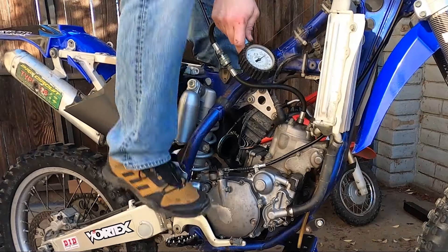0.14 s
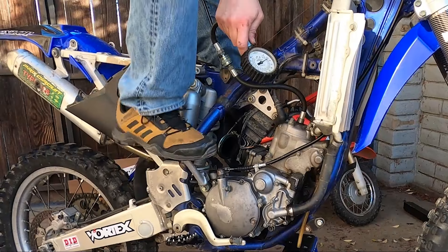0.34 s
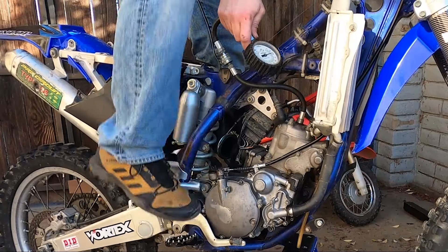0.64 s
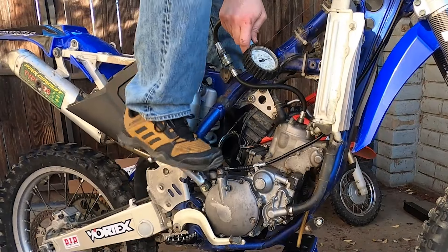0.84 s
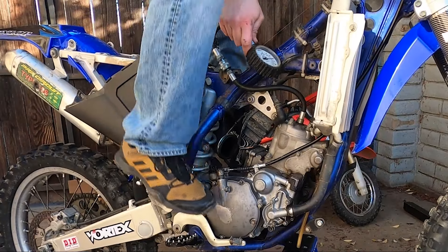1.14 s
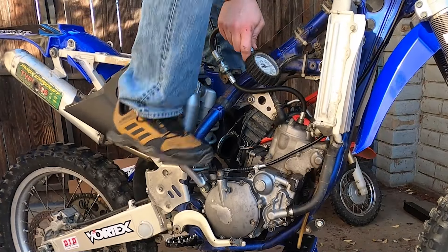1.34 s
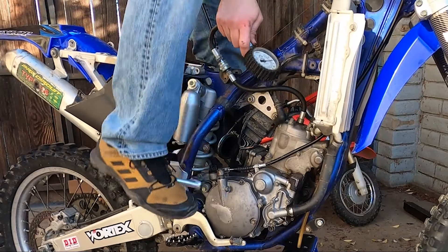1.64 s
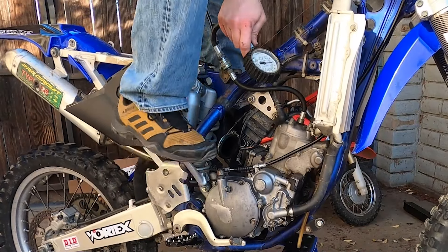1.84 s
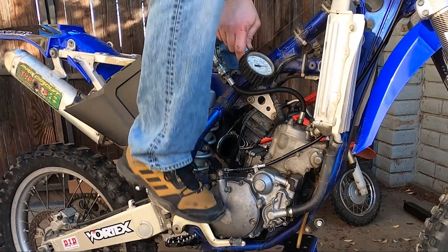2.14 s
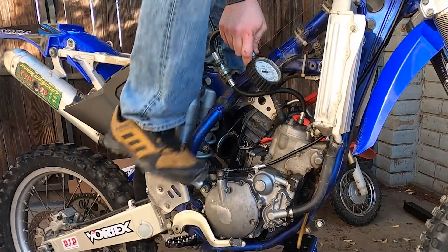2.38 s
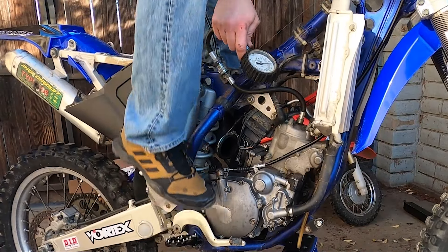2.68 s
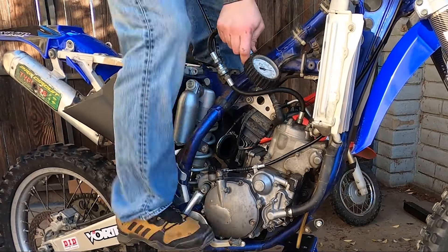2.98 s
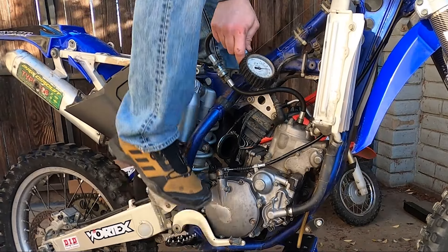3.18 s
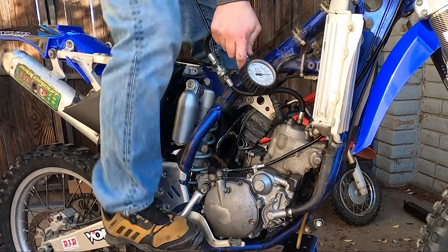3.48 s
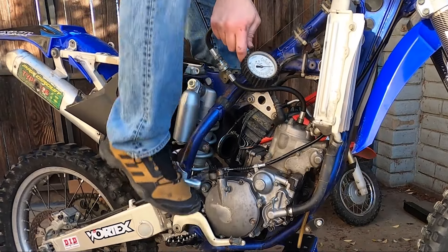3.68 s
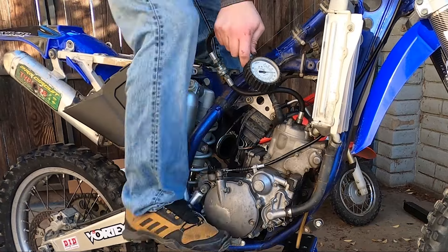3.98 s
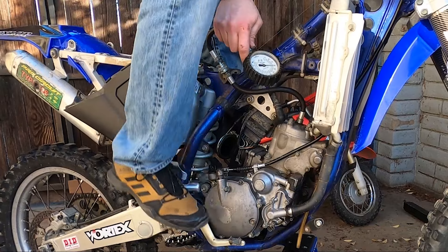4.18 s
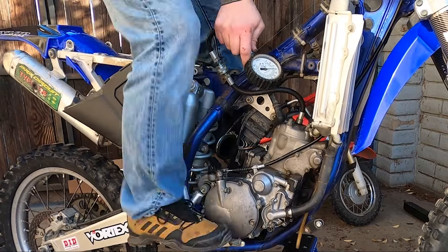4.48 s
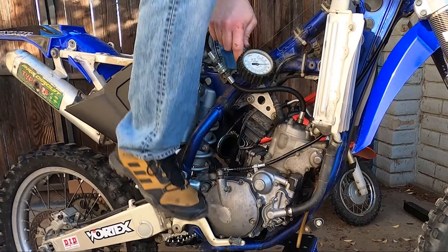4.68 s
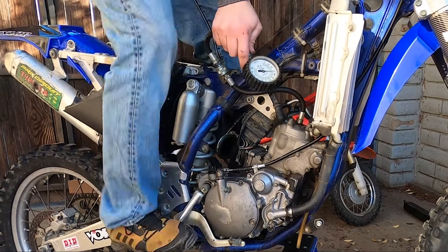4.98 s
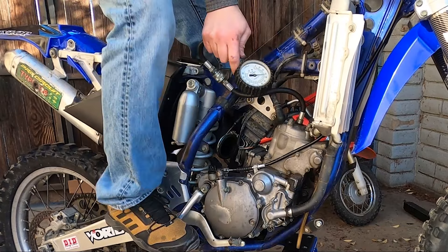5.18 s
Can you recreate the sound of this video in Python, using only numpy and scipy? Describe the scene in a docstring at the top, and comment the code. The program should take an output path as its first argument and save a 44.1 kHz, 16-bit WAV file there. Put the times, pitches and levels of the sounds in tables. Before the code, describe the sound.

A small two-stroke engine is kicked over by foot, close to a mono microphone in a quiet yard with faint, short echoes off fence and bricks. The first stroke arrives at about 0.1 s with a pop and metallic clacks; others follow roughly every half second, near 0.55, 1.05, 1.5, 2.05, 2.5, 3.05, 3.55, 4.05, 4.5 and 5.05 s. Each begins with lever and ratchet clacks and a dull knock, then a sharp crack dropping into a hollow low pop, a short nasal intake honk around 900 hertz, and usually a second pop some 0.07 s later. Lumpy, grinding gear noise swells beneath and runs down quickly. Small ticks and bright pings fill the gaps; a very faint squeak sinks at 1.8 s and a barely audible groan comes at 3.9 s. The clack at 3.55 s is especially hard. The engine never fires; the last rattle fades after 5.2 s into soft air noise and faint hum.

```python
"""Beside a fence and a brick wall, a boot kicks a small two-stroke engine over twice a second; it never fires.
At each turn the exhaust port pops in three falling steps and the intake honks, both made of short resonances.
Lever, ratchet and gears clack as noise rattles ringing in the metal, over the crank's churn of lumpy noise.
Sparse echoes come off the fence and bricks, and a quiet yard with a faint hum lies behind."""
import sys
import numpy as np
from scipy import signal
from scipy.fft import rfft, irfft
from scipy.io import wavfile
from scipy.ndimage import uniform_filter1d

SR = 44100
rng = np.random.default_rng(int(sys.argv[2]) if len(sys.argv) > 2 else 0)


def dump(signal):
    """Clip the signal to [-1, 1] and save it as 16-bit WAV at the path in sys.argv[1]."""
    limited = np.clip(np.atleast_2d(signal).T, -1, 1)
    pcm = np.round(limited * 32767).astype(np.int16)
    wavfile.write(sys.argv[1], SR, pcm)


N = 234590

# Colour of metal struck on metal. Each row: frequency in Hz, relative spectral level in dB.
BLOW_COLOUR = [(200, -29), (500, -7.5), (1160, -2.5), (1500, -6), (2050, -7.5), (2800, -3.5), (6500, -17.5),
               (8700, -15), (16000, -57)]


def gain_of(db):
    """Turns dB into an amplitude factor."""
    return 10 ** (np.asarray(db) / 20)


def evened(x):
    """Scales a signal to rms 1."""
    return x / np.sqrt(np.mean(x ** 2) + 1e-20)


def read(points, hz):
    """Reads a curve of (Hz, value) rows on a log-frequency axis."""
    f, value = np.transpose(points)
    return np.interp(np.log(hz + 1), np.log(f + 1), value)


def add(mix, s, sound):
    """Mixes a sound in at s seconds, cut at the end of the mix."""
    part = mix[round(s * SR):][:len(sound)]
    part += sound[:len(part)]


def coloured(count, points, tilt_db=0):
    """Noise of rms 1 with the given spectrum, tilted about 2 kHz by tilt_db per octave."""
    hz = np.fft.rfftfreq(count, 1 / SR)
    shape_db = read(points, hz) + tilt_db * np.log2((hz + 50) / 2000)
    return evened(irfft(rfft(rng.standard_normal(count)) * gain_of(shape_db), count))


def resonate(x, hz, width):
    """A resonance of gain 1: shifts the pitch hz (fixed or a curve) to zero, smooths, and shifts back."""
    turn = np.exp(2j * np.pi * np.cumsum(hz * np.ones(len(x))) / SR)
    r = np.exp(-np.pi * width / SR)
    smoothed = signal.lfilter([1 - r], [1, -r], x / turn + 1e-18)
    return 2 * (turn * smoothed).real


def burst(start, hz, db, t60, rise, rough):
    """One resonance swells at start seconds and dies away, part tone and part breathy noise."""
    t = np.maximum(np.arange(4096) / SR - start, 0)
    width = 0.34 * hz
    noise = evened(resonate(resonate(rng.standard_normal(len(t)), hz, width), hz, width))
    tone = np.sin(2 * np.pi * hz * rng.uniform(0.94, 1.04) * t)
    fade = gain_of(db - 60 * np.maximum(t - rise, 0) / t60)
    swell = np.sin(np.pi / 2 * np.minimum(t / rise, 1))
    return fade * swell * (tone + rough * noise)


def pop(fall, thump_db, crack_db):
    """Air cracks and squirts through the first slit, the emptying cylinder rings, then the slug thumps the pipe."""
    slit_hz, port_ring_hz, cylinder_hz, header_hz = 1402, 2682, 840, 385
    # The exhaust pipe. Each row: frequency in Hz, level in dB against the thump, 60 dB fade in seconds.
    pipe_modes = [(45.5, -16.5, 0.13), (118.7, -12.5, 0.058), (166.3, -7.5, 0.023), (256.6, -9, 0.049)]
    crack = clack(crack_db, -3)
    squirt = burst(0, slit_hz, crack_db - 4.5, 0.036, 0.0031, 0.36)
    barrel = burst(0, port_ring_hz, crack_db - 14, 0.03, 0.001, 0.24)
    cylinder = burst(max(fall - 0.008, 0), cylinder_hz, thump_db - 8.5, 0.031, 0.0025, 1.0)
    thump = -burst(fall - 0.004, header_hz, thump_db - 1, 0.018, 0.0033, 0.66)
    pipe = sum(burst(fall - 0.006, hz, thump_db + db, t60, 0.0063, 0.32) for hz, db, t60 in pipe_modes)
    # the pipe throws air back
    rebound = burst(fall + 0.004025, 0.817 * cylinder_hz, thump_db - 9.5, 0.01, 0.0017, 1.0)
    sound = crack + squirt + barrel + cylinder + thump + pipe + rebound
    blast = clack(thump_db - 14.5, 7)  # bright hiss of the escaping slug
    add(sound, fall, blast)
    return sound


def honk(db, swell):
    """The air box rings as the port opens and again, weaker, as the sucked air surges back."""
    air_box_hz, t60_s = 872, 0.049
    gulp = burst(0, air_box_hz, db, t60_s, swell, 0.32)
    surge_back = burst(0.00576, air_box_hz, db - 11.0, t60_s, 0.0063, 0.82)
    return gulp + surge_back


def clack(db, tilt_db):
    """A crack and a short uneven rattle, part heard direct, part through the ringing cases and lever."""
    # The engine cases. Each row: frequency in Hz, width in Hz, relative level in dB.
    case_modes = [(1493, 220, 0.5), (2690, 170, -5), (3390, 78, -22), (4480, 160, -7.5), (8250, 610, -12),
                  (12130, 3000, -24)]
    # The lever. Each row: frequency in Hz, relative level in dB, 60 dB fade in seconds.
    lever_modes = [(720.5, -5.5, 0.11), (1227, 0, 0.076), (1347, -2.5, 0.14), (2727, -12.5, 0.054)]
    t = np.arange(4096) / SR
    rattle_t60_s = max(0.081 - 0.0046 * tilt_db, 0.02)  # dull blows linger
    bounces = gain_of(2 * evened(uniform_filter1d(rng.standard_normal(len(t)), 90)))
    crack = 1.05 * gain_of(-60 * t / 0.0034)
    attack = np.minimum(t / 0.00074, 1)
    shape = (bounces * gain_of(-60 * t / rattle_t60_s) + crack) * attack
    direct = coloured(len(t), BLOW_COLOUR, tilt_db) * shape
    cases = np.zeros(len(t))
    for hz, width, mode_db in case_modes:  # every blow lands elsewhere and wakes the modes unevenly
        woken_db = mode_db + tilt_db * np.log2(hz / 2000) + 1.0 * rng.standard_normal()
        struck = shape * rng.standard_normal(len(t))
        cases += gain_of(woken_db) * resonate(struck, hz * rng.uniform(0.881, 1.076), width)
    cases *= 0.62 * direct.std() / cases.std()
    lever_db = db - 20 - 1.5 * tilt_db  # the duller the blow, the more the lever rings
    lever = sum(burst(0, hz, lever_db + mode_db, t60, 0.0027, 0.36) for hz, mode_db, t60 in lever_modes)
    return gain_of(db - 8) * (direct + cases) + lever


def thud(db):
    """A soft low knock through the frame, a little higher or lower each time."""
    frame_hz = 387 * rng.uniform(0.83, 1.086)
    return burst(0, frame_hz, db, 0.017, 0.0057, 0.9)


def ping(db, hz):
    """A small loose part rings, short and bright."""
    return burst(0, hz, db, 0.012, 0.00057, 0.69)


def groan():
    """The loaded lever pivot moans on a few fuzzy pitches, swelling slowly and dying faster."""
    # The moan. Each row: frequency in Hz, level in dB before the swell.
    pitches = [(195, -51), (990, -54.5), (1900, -57.5)]
    swell = np.sin(np.linspace(0, np.pi, 6000) ** 2 / np.pi)
    moan = sum(gain_of(db) * evened(resonate(rng.standard_normal(len(swell)), hz, 0.02 * hz))
               for hz, db in pitches)
    return swell * moan


def squeak():
    """A faint fuzzy whistle that sinks and fades as the crank stops."""
    length_s, start_hz, sag_hz, level_db = 0.062, 900, 80.5, -48
    u = np.linspace(0, 1, round(length_s * SR))
    whistle = evened(resonate(rng.standard_normal(len(u)), start_hz - sag_hz * u, 6.4))
    return gain_of(level_db - 10 * u) * np.sqrt(np.sin(np.pi * u) + 1e-9) * whistle


def teeth():
    """Gear teeth knock at scattered moments and sizes, each waking one short ring somewhere in the cases."""
    knocks_per_s, spread_db = 600, 4
    knocks = rng.random(N) < knocks_per_s / SR
    size = gain_of(spread_db * np.minimum(rng.exponential(1, N), 3)) * knocks
    pitches = np.geomspace(1150, 9000, num=16)
    place = rng.integers(0, len(pitches), N)
    t = np.arange(1024) / SR
    total = np.zeros(N)
    for k, hz in enumerate(pitches):
        fade = gain_of(read(BLOW_COLOUR, hz) - 60 * t * hz / 22)  # falls 60 dB in 22 cycles
        ring = fade * np.sin(2 * np.pi * hz * t)
        total += signal.oaconvolve(size * (place == k), ring)[:N]
    return evened(total)


def churn():
    """Rubbing and meshing parts: noise in lumps of changing colour that swells with each stroke and runs down."""
    # Each stroke spins crank, gears and rings. Each row: start in seconds, level in dB.
    strokes = [(0.01, -43), (0.502, -34.5), (0.991, -37), (1.489, -30), (2.014, -33), (2.5, -33),
               (2.989, -30), (3.509, -32.5), (3.992, -33.5), (4.51, -33), (5.012, -35.5)]
    # Colour of the rubbing. Each row: frequency in Hz, relative spectral level in dB.
    rub_colour = [(60, -3), (360, 11.5), (880, 0), (1340, 2), (2050, -11.5), (2770, -8.5), (8120, -15.5),
                  (12500, -25), (16000, -28)]
    spin_up_s, spin_s, run_down_db_per_s, teeth_db = 0.16, 0.15, 167, -5.5  # teeth against the rub
    t = np.arange(N) / SR
    speed = np.zeros(N)
    for start, db in strokes:
        run_down_db = run_down_db_per_s * np.maximum(t - start - spin_s, 0)
        speed += gain_of(db - run_down_db) * np.clip((t - start) / spin_up_s, 0, 1)
    z = signal.stft(coloured(N, rub_colour), nperseg=256, noverlap=192)[2]
    # patches shift the colour, lumps the whole level
    grain = uniform_filter1d(rng.standard_normal(z.shape), 9, axis=0)
    patches = evened(uniform_filter1d(grain, 5, axis=1))
    lumps = evened(uniform_filter1d(rng.standard_normal(z.shape[1]), 4))
    lumpy = z * gain_of(4.0 * patches + 3.7 * lumps)
    rub = evened(signal.istft(lumpy, nperseg=256, noverlap=192)[1][:N])
    return speed * (rub + gain_of(teeth_db) * teeth())


def walls(x):
    """Sparse echoes of random sign off fence and bricks, each band dying at its own speed."""
    # How long the echoes last. Each row: frequency in Hz, 60 dB fade in seconds.
    fades = [(300, 0.29), (8000, 0.19)]
    taps = np.zeros(SR // 2)
    at = np.arange(200, len(taps) - 20, 20)
    taps[at + rng.integers(0, 20, len(at))] = rng.choice([-1., 1.], len(at))
    hz, t, z = signal.stft(taps, SR, nperseg=256)
    decay = gain_of(-60 * t / read(fades, hz)[:, None])
    tail = signal.istft(z * decay, SR, nperseg=256)[1]
    return signal.fftconvolve(x, tail / np.linalg.norm(tail))[:N]


def yard():
    """Quiet outdoor background noise that swells slowly, with a faint fuzzy hum."""
    # Colour of the open air. Each row: frequency in Hz, relative spectral level in dB.
    air_colour = [(20, 14), (70, 0.5), (400, -0.5), (1480, -11), (7950, -28), (14000, -32.5)]
    air_db, hum_hz, hum_db = -63.5, 497, -70
    swell = evened(uniform_filter1d(uniform_filter1d(rng.standard_normal(N), 6000), 4000))
    air = gain_of(air_db + 3.0 * swell) * coloured(N, air_colour)
    hum = evened(resonate(rng.standard_normal(N), hum_hz, 2.4))
    return air + gain_of(hum_db) * hum


def scene():
    """Places all the engine's sounds over its churn, then adds the echoes and the yard."""
    # Exhaust port opening. Each row: start in seconds, thump delay in seconds, thump level in dB, crack level in dB.
    pops = [(.107, 0.014, -12.5, -14.5), (.639, 0.018, -14.5, -14), (.695, 0.0073, -34, -48),
            (1.062, 0.022, -12, -19), (1.140, 0.018, -16.5, -15), (1.558, 0.018, -13, -14.5),
            (1.626, .013, -15, -17.5), (2.077, 0.017, -11, -19.5), (2.146, 0.01, -13, -20),
            (2.583, 0.017, -11.5, -11.5), (2.645, 0.01, -15.5, -24.5), (3.071, 0.019, -8.5, -25.5),
            (3.134, 0.0098, -13.5, -20), (3.62, .011, -11.5, -17), (3.686, 0.0142, -19.5, -20),
            (4.068, 0.016, -9, -17.5), (4.132, 0.011, -12.5, -20.5), (4.558, .022, -10, -22),
            (4.628, .011, -12.5, -15), (4.699, 0.015, -34, -19.5), (5.077, .013, -9.5, -12),
            (5.135, 0.0082, -12.5, -17)]
    # Intake gulps. Each row: start in seconds, level in dB, swell in seconds.
    honks = [(0.152, -22, 0.0042), (0.604, -15.5, 0.0064), (1.106, -19, 0.0046), (1.597, -12.5, .003),
             (2.117, -15.5, 0.0026), (2.195, -29, 0.0042), (2.618, -12, 0.0018), (2.691, -27, 0.0036),
             (3.111, -11.5, 0.0027), (3.173, -22, 0.004), (3.595, -12.5, 0.0028), (3.650, -15, 0.0084),
             (4.105, -13, .003), (4.168, -25, 0.0071), (4.603, -11.5, 0.0042), (4.659, -18.5, 0.0044),
             (5.110, -12, .003), (5.173, -24, .008)]
    # Boot on the lever, or the lever on its stop. Each row: start in seconds, level in dB.
    thuds = [(0.548, -28), (0.772, -33), (1.039, -26), (1.2, -28), (1.301, -33), (1.527, -31), (2.037, -41),
             (2.05, -28), (2.511, -24.5), (2.549, -23.5), (3.507, -39.5), (3.559, -27.5), (3.744, -36),
             (4.71, -26.5), (5.04, -28)]
    # Loose part. Each row: start in seconds, level in dB, approximate pitch in Hz.
    pings = [(0.534, -25, 3200), (0.781, -33, 4620), (2.227, -37, 4340), (2.279, -51, 5300),
             (4.039, -23.5, 3030), (4.52, -33, 3300)]
    # Metal on metal. Each row: start in seconds, level in dB, tilt in dB per octave.
    clacks = [(0.0722, -20, -7.5), (0.139, -15, 0.5), (0.194, -15.5, -5.5), (0.4394, -47, -1),
              (0.47, -51, 1), (0.509, -50, -2), (0.5267, -32, 0), (0.5445, -19, -1), (0.7049, -23.5, -5.5),
              (0.755, -37, 1), (0.7815, -32.5, -0.5), (1.0096, -40.5, 0), (1.036, -22.5, -2),
              (1.1116, -16.5, -5.5), (1.2167, -21.5, -6), (1.3083, -40.5, -3), (1.4298, -41.5, 1.5),
              (1.496, -46.5, -1), (1.5062, -26.5, -2), (1.5193, -18, -2), (1.6152, -17, 2),
              (1.7679, -31, -1.5), (1.7765, -37.5, -5.5), (1.9019, -42, -3), (1.9802, -44, 2),
              (2.016, -40, 0), (2.0263, -35, -4), (2.0455, -22.5, -3.5), (2.1226, -14.5, -6),
              (2.226, -47, 6), (2.266, -38, -4.5), (2.3521, -36.5, -1), (2.435, -40, 4),
              (2.5088, -30, -2.5), (2.5432, -18.5, -1), (2.5603, -20.5, -5.5), (2.6305, -22, 0),
              (2.76, -46, -4.5), (2.9706, -44, 2.5), (3.021, -48, -4), (3.037, -21, -0.5), (3.1249, -20, 3),
              (3.2186, -17, -5.5), (3.458, -38.5, 4.5), (3.4973, -43, 2), (3.535, -31, -3),
              (3.549, -19, -1), (3.5532, -11, -1.5), (3.7578, -21, -5), (4.0011, -41, -2),
              (4.012, -32.5, -0.5), (4.031, -28.5, -0.5), (4.0386, -20, -1), (4.0834, -22, 13),
              (4.265, -51.5, 2), (4.508, -41, -0.5), (4.5192, -38, -3.5), (4.5374, -26.5, -5.5),
              (4.799, -25.5, -7.5), (4.9513, -37, 3.5), (5.019, -34, -1.5), (5.0339, -19.5, 0.5),
              (5.0403, -16, -0.5), (5.1218, -22.5, 4), (5.2331, -21.5, -6.5)]
    engine = churn()
    for table, source in ((pops, pop), (honks, honk), (thuds, thud), (pings, ping), (clacks, clack)):
        for s, *settings in table:
            add(engine, s, source(*settings))
    add(engine, 3.915, groan())
    add(engine, 1.785, squeak())
    # so small a machine radiates little deep bass
    engine = signal.sosfilt(signal.butter(2, 95, "high", fs=SR, output="sos"), engine)
    return (engine + gain_of(-12.0) * walls(engine) + yard())[None]


def record(dry):
    """The microphone signal: loud peaks are squeezed softly, then the band is limited."""
    edge_hz = 16000
    squeezed = 0.5 * np.tanh(dry / 0.5)
    band_limit = signal.firwin(511, edge_hz, window=("kaiser", 9), fs=SR)
    return signal.oaconvolve(squeezed, band_limit[None], "same")


dry = scene()
out = record(dry)
dump(out)
```